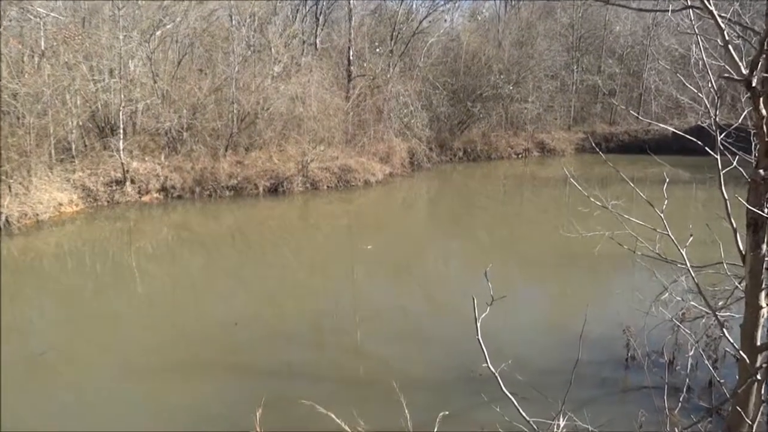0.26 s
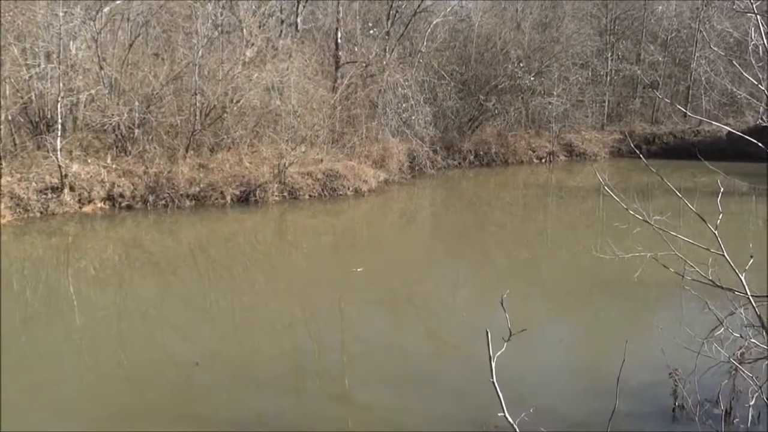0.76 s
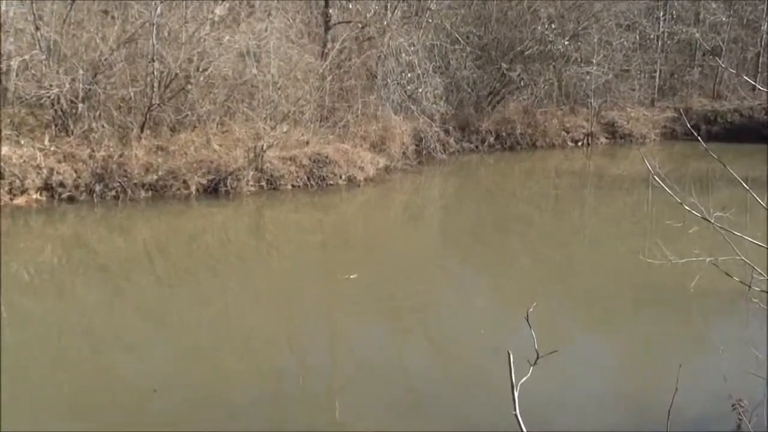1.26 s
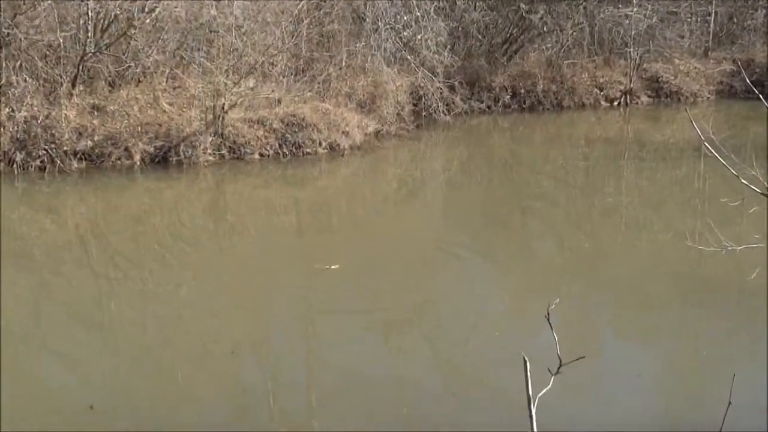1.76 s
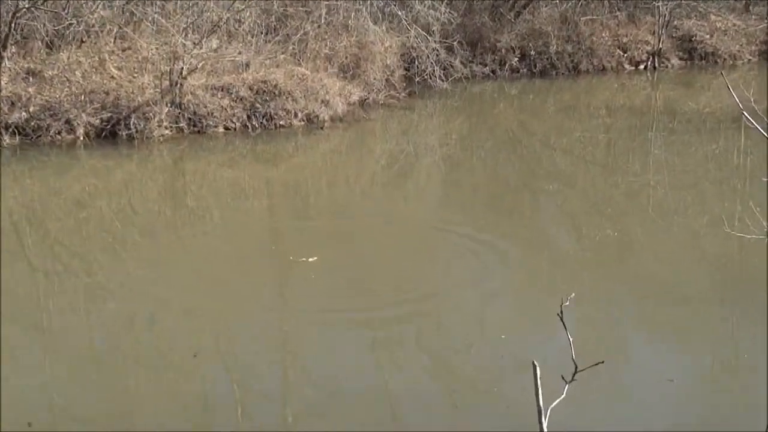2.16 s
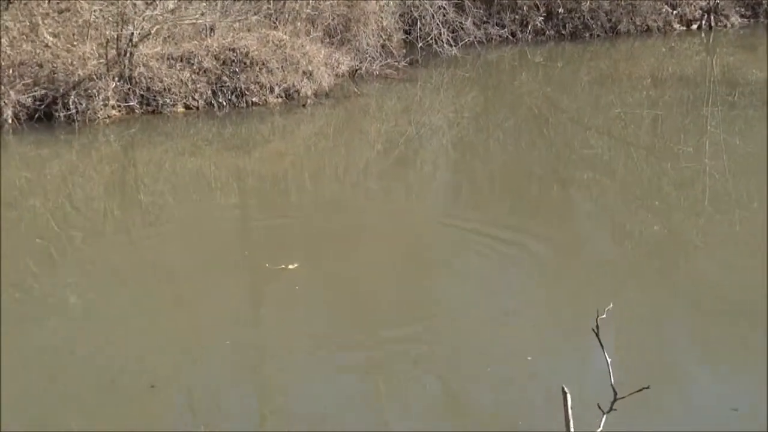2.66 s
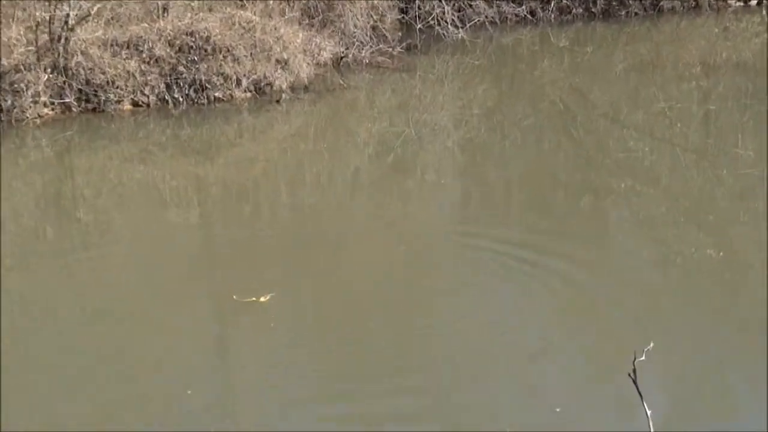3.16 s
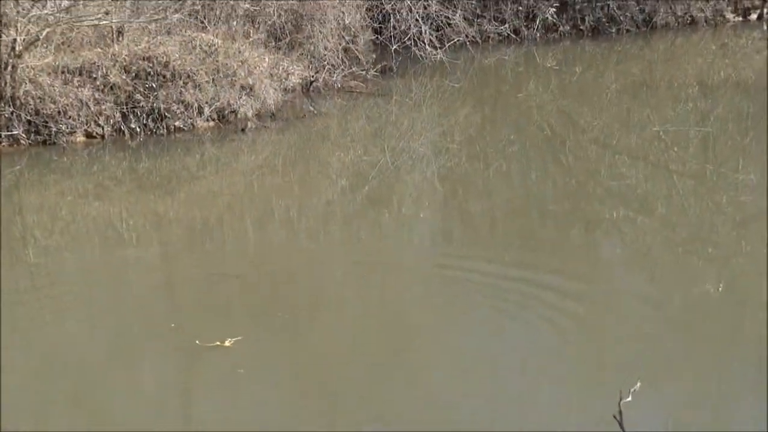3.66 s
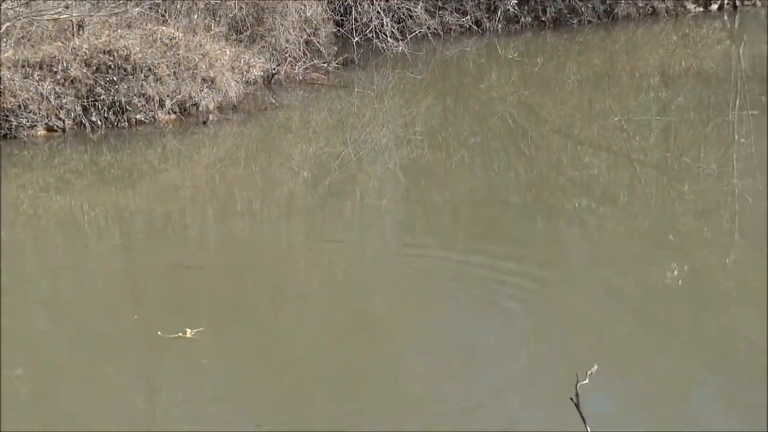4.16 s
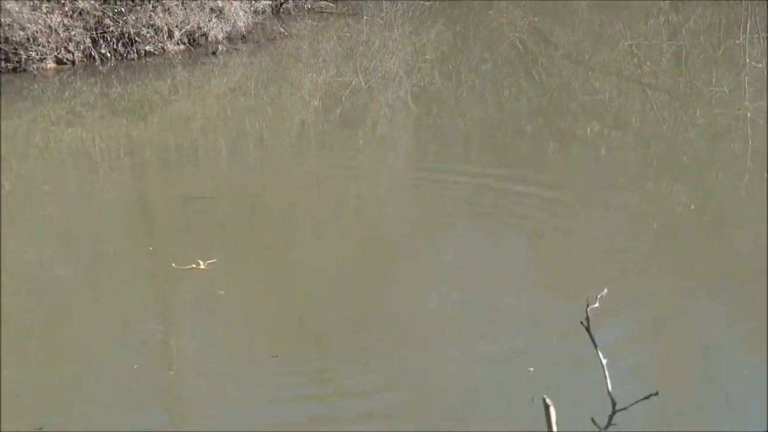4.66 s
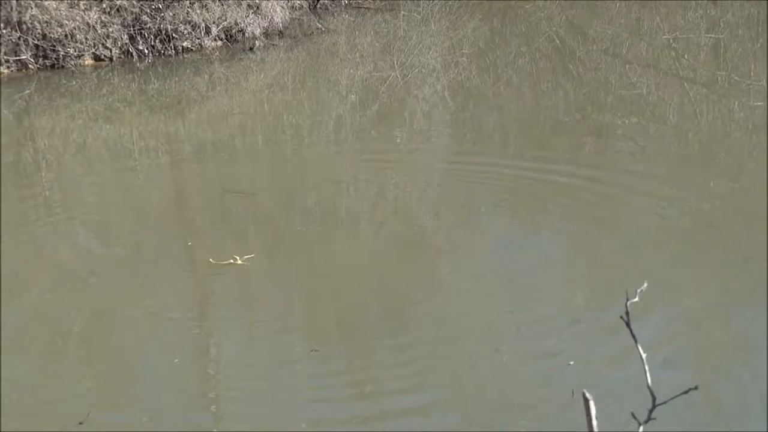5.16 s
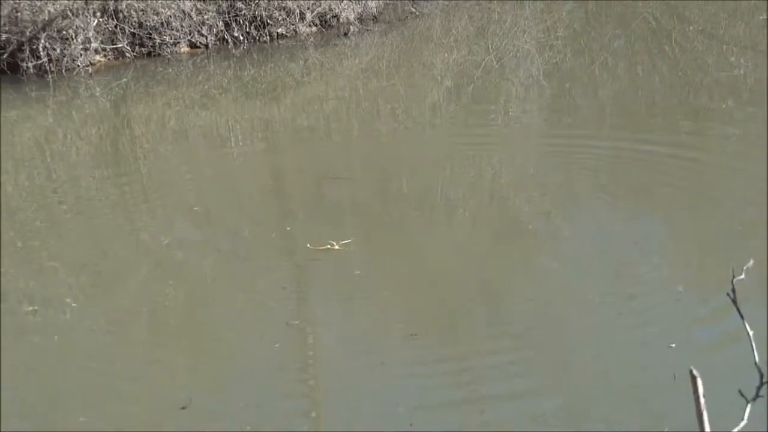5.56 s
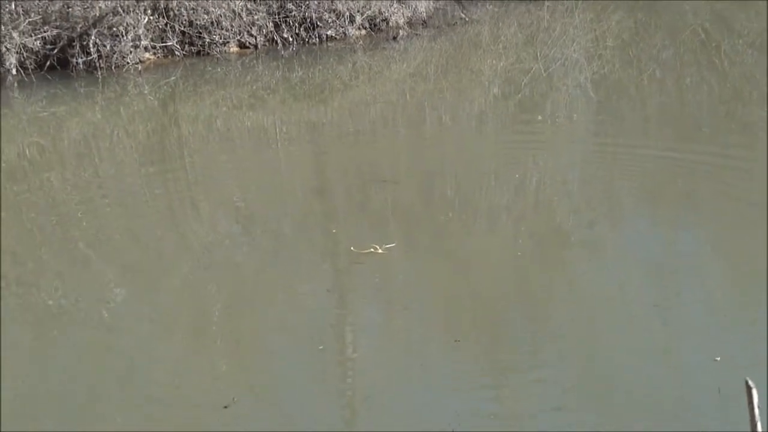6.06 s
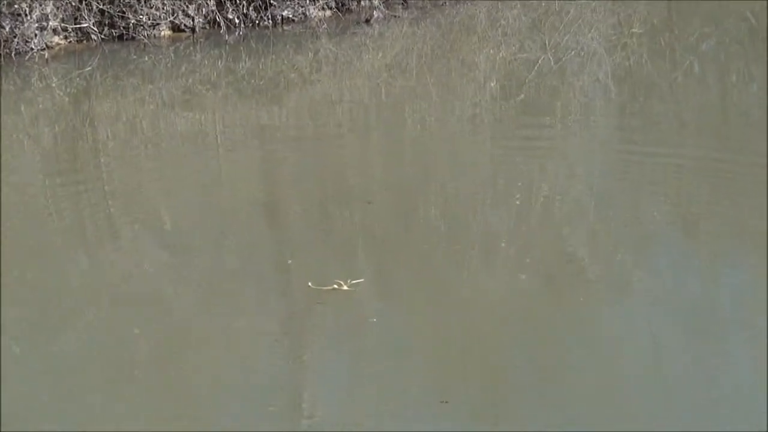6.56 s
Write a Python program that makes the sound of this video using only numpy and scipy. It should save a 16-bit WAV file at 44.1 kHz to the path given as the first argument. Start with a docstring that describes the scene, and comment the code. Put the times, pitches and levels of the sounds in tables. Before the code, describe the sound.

Small frogs are already trilling across a wooded pond, a high chorus of quick pulses that climbs in pitch in overlapping waves, roughly every one to one and a half seconds, with leaders first and others joining. Trees smear the calls into a short echo. Beneath lie soft open air and a faint wavering low hum, stronger from about 4.5 to 6 seconds. A gentle finger rub opens the stretch, and from 0.3 to 3.4 seconds a close zoom motor hisses and ticks thinly. At 3.3 seconds several very sharp plastic clicks snap in quick succession; the chorus drops quieter, then gradually returns. Tiny taps come near 4.0 and 4.6. Around 5.4 to 5.8 there are short rubs and a small click with a low bump. At 6.1 a hard click, scrape and thud land together, and from 6.3 the motor whirrs again under the frogs to the end.

```python
"""From the start, small frogs trill in waves across a wooded pond, leaders first and the rest joining in:
damped pulses quicken and rise in pitch, and tree trunks scatter them. Open air is shaped noise, a far hum
two sines. A hand-held camera adds finger rubs and its zoom motor's ticking hiss, both filtered noise.
After three seconds sharp clicks ring the camera's shell modes, and gain control ducks what follows the
loudest. Later come more rubs, two low nudges of the hand among further clicks, and the zoom again."""
import sys
import numpy as np
from scipy import signal
from scipy.fft import rfft, irfft, next_fast_len
from scipy.io import wavfile
from scipy.ndimage import uniform_filter1d

SR = 44100
rng = np.random.default_rng(int(sys.argv[2]) if len(sys.argv) > 2 else 0)


def to_wav(s):
    """Save 16-bit WAV."""
    ch = np.atleast_2d(s).T  # columns
    pcm = np.round(np.clip(ch, -1, 1) * 32767)  # PCM
    wavfile.write(sys.argv[1], SR, pcm.astype(np.int16))


N = 300321
TIME = np.arange(N) / SR


def gain_of(db):
    """Logarithmic level: 20 dB is a factor of ten in amplitude."""
    return 10 ** (np.asarray(db) / 20)


def evened(x):
    """Normalisation: equal mean power, at an rms of 1."""
    return x / np.sqrt(np.mean(np.abs(x) ** 2) + 1e-20)


def leaned(x, lean_db):
    """Level difference between channels: the left falls and the right rises by lean_db."""
    return gain_of(np.array([[-lean_db], [lean_db]])) * x


def read(points, hz):
    """Interpolation of a spectrum along a log-frequency axis."""
    f, value = np.transpose(points)
    return np.interp(np.log(hz + 1), np.log(f + 1), value)


def add(mix, s, sound):
    """Superposition: mixes a sound in at a time, which may lie before the start."""
    at = round(s * SR)
    sound_length = sound.shape[-1] + min(at, 0)
    part = mix[..., max(at, 0):][..., :sound_length]
    audible = sound[..., max(-at, 0):]
    part += audible[..., :part.shape[-1]]


def coloured(x, spectrum):
    """Linear filtering: weights a signal's spectrum, then scales it to an rms of 1."""
    size = next_fast_len(N)
    weight = gain_of(read(spectrum, np.fft.rfftfreq(size, 1 / SR)))
    return evened(irfft(rfft(x, size) * weight, size)[..., :N])


def drift(knots_per_s):
    """Slow random fluctuation: straight lines between Gaussian knots of unit variance."""
    knots = rng.standard_normal(200)
    return np.interp(TIME * knots_per_s, np.arange(len(knots)), knots)


def noise(spectrum, patchy_db):
    """Partly coherent stereo noise: a shared and an independent part, with drifting spectral patches."""
    # likeness of the two channels: f/Hz, coherence (-1 opposed to 1 alike)
    coherence = [(30, 0.95), (110, 0.94), (220, 0.31), (400, -0.068), (800, -0.31), (1400, -0.21),
                 (2300, 0.35), (4500, 0.51), (8000, 0.89), (15000, 1)]
    frames, hz = N // 512 + 5, np.fft.rfftfreq(2048, 1 / SR)
    a, b, c, d, patches = rng.standard_normal((5, frames, len(hz)))
    patches = uniform_filter1d(patches, size=7, axis=0)  # smooth over time
    patches = evened(uniform_filter1d(patches, size=18, axis=1))  # and over frequency
    same = read(coherence, hz)
    left, independent = a + 1j * b, c + 1j * d
    right = same * left + np.sqrt(1 - same ** 2) * independent
    z = np.array([left, right]) * gain_of(read(spectrum, hz) + patchy_db * patches)
    return evened(signal.istft(z.transpose(0, 2, 1), nperseg=2048, noverlap=1536)[1][:, :N])


def trill(length, first_hz, last_hz, first_rate=14, last_rate=23, ring_s=0.00099,
          jitter_hz=25, uneven_db=2.2, late=1.35):
    """Damped resonance: quickening, rising pulses ring a frog's vocal sac under a swell and fade."""
    # partials of a pulse: multiple of the fundamental, relative level/dB; the second carries the pitch
    partials = [(1, -29), (2, 1), (3, -27)]
    count = int(length * (first_rate + last_rate) / 2 * rng.uniform(.85, 1.15))
    gaps = 1 / np.linspace(first_rate, last_rate, count)  # relative; they are stretched to fill the length
    progress = ((np.cumsum(gaps) - rng.random() * gaps) / gaps.sum())[:, None]
    detune, force, phase = rng.standard_normal((3, 80, 1))[:, :count]
    hz = first_hz + (last_hz - first_hz) * progress + jitter_hz * detune
    # late above 1 puts the swell's peak after the middle, below 1 before it
    swell = np.sqrt(np.sin(np.pi * progress ** late)) * gain_of(uneven_db * force)
    age = np.arange(900) / SR
    # the sac takes a few cycles to build up, which keeps each pulse narrow in pitch
    ring = (age / ring_s) ** 3 * np.exp(-age / ring_s)
    # hz is the second partial, so the fundamental is hz / 2
    tone = sum(gain_of(db) * np.sin(np.pi * k * (hz * age + 2 * phase)) for k, db in partials)
    at = (progress * length * SR).astype(int) + np.arange(len(age))
    return evened(np.bincount(at.ravel(), (swell * ring * tone).ravel()))


def woods(x):
    """Diffuse reverberation: tree trunks scatter calls into a dense tail whose decay depends on frequency."""
    # decay among the trees: f/Hz, t60/s
    decay = [(1500, 0.7), (3000, 0.49), (6000, 0.21)]
    taps = rng.standard_normal(SR // 2)
    hz, t, z = signal.stft(taps, SR, nperseg=256)
    fading = gain_of(-60 * t / read(decay, hz)[:, None])
    tail = signal.istft(z * fading, SR, nperseg=256)[1]
    return signal.oaconvolve(x, tail / np.linalg.norm(tail))[:len(x)]


def chorus(level_db=-4.4, direct_db=-3.6, echo_db=-2.3, side_db=-12, outer_db=-5,
           stagger_s=.045, lean_db=1.28, count=8):
    """Superposed sources: frogs of graded size lead or follow each wave, ahead and slightly to the right."""
    # waves of calling: nominal start t/s, trill length/s, wait until the rest join/s,
    # leaders' first f/Hz, followers' first f/Hz (both for middle size), relative level/dB
    waves = [(-0.73, 1.43, .55, 2620, 2600, -43.7), (0.76, 1.02, .48, 2530, 2795, -46.3),
             (1.96, 1.44, .18, 2680, 2590, -43.2), (3.3, 1.32, .3, 2630, 2545, -42.8),
             (4.7, 1.35, .17, 2745, 2580, -43.6), (5.75, 1.41, .25, 2610, 2660, -46)]
    lead_rise, follow_rise = 440, 410  # Hz per s; every trill climbs steadily in pitch
    lead_spread_hz, follow_spread_hz = 238, 208  # smallest frogs this much higher, largest this much lower
    leaders_db = -1.5  # leaders are weaker
    preroll = 1  # s, room for calls and echoes begun before the start
    sizes = np.linspace(-1, 1, count)
    shares = evened(gain_of(outer_db * sizes ** 2)) / np.sqrt(count)  # middle-sized frogs dominate
    banks = np.zeros((3, N + preroll * SR))  # three stretches of shore, each with its own echo
    for start, length, wait, leaders_hz, followers_hz, db in waves:
        leaders = start, leaders_hz, lead_rise, lead_spread_hz, db + leaders_db
        followers = start + wait, followers_hz, follow_rise, follow_spread_hz, db
        for s, group_hz, rise, spread_hz, group_db in (leaders, followers):
            for frog, (size, share) in enumerate(zip(sizes, shares)):
                hz = group_hz + size * spread_hz
                call = gain_of(group_db) * share * trill(length, hz, hz + rise * length)
                add(banks[frog % len(banks)], preroll + s + rng.uniform(-stagger_s, stagger_s), call)
    direct = gain_of(direct_db) * banks.sum(0)
    ahead = direct + gain_of(echo_db) * sum(woods(bank) for bank in banks)
    side = gain_of(side_db) * woods(banks.sum(0))
    stereo = np.array([ahead + side, ahead - side])[:, preroll * SR:]
    return gain_of(level_db) * leaned(stereo, lean_db)


def near_frogs(echo_db=-2, lean_db=1.0, stagger_s=.02, count=2):
    """Narrow-band resonance: pairs of closer frogs of like size draw a narrow rising line through the chorus."""
    # pairs of closer frogs: nominal start t/s, length/s, first f/Hz, relative level/dB
    pairs = [(-0.75, .91, 2995, -51), (1.2, 1.1, 2635, -52.5), (6.06, .46, 2640, -52)]
    rise = 503  # Hz per s
    calls = np.zeros(N)
    for start, length, hz, db in pairs:
        for frog in range(count):
            call = trill(length, hz, hz + rise * length, first_rate=17, last_rate=26,
                         ring_s=0.0016, jitter_hz=8, late=0.64)
            add(calls, start + rng.uniform(-stagger_s, stagger_s), gain_of(db) * call / np.sqrt(count))
    return leaned(calls + gain_of(echo_db) * woods(calls), lean_db)


def background(air_db=-57.5, hum_hz=97.3, waver_db=2.0, wander_hz=1.63, octave_db=-19):
    """Broadband noise of open air, and a far hum: a wavering tone and its octave by phase accumulation."""
    # open air: f/Hz, relative level/dB per Hz
    air_spectrum = [(20, -7), (45, -3), (80, -0.5), (130, -6.5), (220, -9.5), (450, -11), (800, -13.5),
                    (1400, -15), (2100, -19.5), (4500, -23), (6500, -29), (10000, -33), (16000, -36)]
    # distant hum: t/s, mean level/dB before the waver
    hum_level = [(0, -64.5), (1, -64.5), (2.3, -82), (2.7, -65), (4.5, -58), (6.1, -58), (6.8, -65.5)]
    turns = np.cumsum(hum_hz + wander_hz * drift(9)) / SR
    octave = gain_of(octave_db) * np.sin(2 * np.pi * 2 * turns)
    hum = evened(np.sin(2 * np.pi * turns) + octave)
    air = gain_of(air_db) * noise(air_spectrum, patchy_db=1.5)
    hum_db = np.interp(TIME, *np.transpose(hum_level)) + waver_db * drift(14)
    return air + gain_of(hum_db) * hum


def rubs():
    """Friction noise: short swishes of skin on plastic, each a half-cosine burst of shaped noise."""
    # fingers sliding on the camera: centre t/s, length/s, level/dB at the centre
    slides = [(0.104, 0.79, -60), (5.394, 0.23, -62), (5.765, 0.15, -59.5), (6.15, .6, -62),
              (6.066, 0.054, -45.5), (6.073, 0.011, -47.5)]
    # colour of a rub: f/Hz, relative level/dB per Hz
    skin_spectrum = [(200, 2), (500, 1.5), (1500, 6.5), (2500, 6), (4400, 3), (5800, -1.5), (7500, -3.5),
                     (10000, -3), (13000, -9), (16000, -19)]
    level = np.zeros(N)
    for s, length, db in slides:
        level += gain_of(db) * np.cos(np.pi * np.clip((TIME - s) / length, -.5, .5))
    return level * noise(skin_spectrum, patchy_db=0.5)


def motor_level(level_db=-57.5, waver_db=0.6):
    """Motor load: each run spins up, settles, strains a little more as the lens travels, and coasts down."""
    # runs of the zoom motor: start t/s, stop t/s, run-up/s, starting surge level/dB
    runs = [(.26, 3.43, .14, 0), (6.259, 7, 0.0058, 8)]
    strain, run_down, surge_s = 1.0, 100, .22  # dB per s, dB per s (against the strain), s
    level = np.zeros(N)
    for start, stop, run_up_s, surge_db in runs:
        age, coasting = np.maximum(TIME - start, 0), np.maximum(TIME - stop, 0)
        db = surge_db * np.exp(-age / surge_s) + strain * age - run_down * coasting
        level += np.minimum(age / run_up_s, 1) * gain_of(db)
    return level * gain_of(level_db + waver_db * drift(6))


def zoom(hiss_db=-.5, tick_db=-6, grit_db=-8, tick_s=.0011, uneven_db=2, grit_per_s=550):
    """Periodic and random impacts: the lens drive hisses, its gears crackle, a tooth ticks at every turn."""
    # colour of the motor's hiss: f/Hz, relative level/dB per Hz
    hiss_spectrum = [(150, 6), (350, 9), (800, 6.5), (1400, 3), (2200, 6), (3500, 7), (4400, 9.5),
                     (5800, -5.5), (7000, -2), (9000, -1.5), (10500, 0.5), (13000, -2), (16000, -5.5)]
    # colour of its ticks and crackle: f/Hz, gain/dB
    tick_spectrum = [(1000, -24), (5000, -11), (8000, -3.5), (11000, 2), (13500, 4), (16000, -4.5)]
    ticks_per_s = 28  # mean rate
    turns = np.cumsum(ticks_per_s * (1 + .06 * drift(25))) / SR
    force = gain_of(uneven_db * rng.standard_normal(400))[turns.astype(int)]
    ticks = force * np.exp(-(turns % 1) / ticks_per_s / tick_s) * rng.standard_normal(N)
    impacts = (rng.random(N) < grit_per_s / SR) * rng.exponential(1, N)
    grit_envelope = signal.lfilter([1], [1, -np.exp(-1 / (tick_s * SR))], impacts)
    grit = grit_envelope * rng.standard_normal(N)
    gears = gain_of(tick_db) * coloured(ticks, tick_spectrum)
    gears = gears + gain_of(grit_db) * coloured(grit, tick_spectrum)
    return motor_level() * (gain_of(hiss_db) * noise(hiss_spectrum, patchy_db=1) + gears)


def clicks(rattle_db=-13, rattle_s=0.0031, patch=0.26, lean_db=1.1):
    """Modal excitation: blows ring the shell and rattle, reaching the two microphone ports at unequal times."""
    # blows on the camera's controls: t/s at the right port, peak level/dB before the lean,
    # centre f/Hz of the blow, place from the right port (0) to the left port (1)
    blows = [(3.265, -16.5, 1120, 0.016), (3.3026, -22, 4500, 0.065), (3.3061, -5.5, 3700, 0),
             (3.342, -15.5, 3600, .85), (4.021, -38.5, 1100, 0.98), (4.632, -41, 1100, 0.98),
             (5.553, -33, 780, 0.21), (6.0808, -11.5, 2900, 1)]
    # modes of the camera's shell: f/Hz, relative level/dB, t60/s
    shell_modes = [(570, -16.5, 0.015), (1093, -13.5, 0.015), (1955, -6, 0.0089), (2750, -6.5, 0.012),
                   (3610, -5.5, 0.013), (4230, 0, 0.0046), (5400, 5, 0.0041), (7430, 4, 0.0032),
                   (10100, -5.5, 0.0031), (13600, -6, 0.0012)]
    width_octaves, hardness_law = 1.16, 0.83  # width at 1 kHz; harder blows are wider as well as higher
    port_lag_s = .0001  # travel time between the ports
    out, t, hz = np.zeros((2, N)), np.arange(2048) / SR, np.fft.rfftfreq(2048, 1 / SR)
    modes = np.array([gain_of(db - 60 * t / t60) * np.sin(2 * np.pi * f * t) for f, db, t60 in shell_modes])
    order = np.arange(len(shell_modes)) + 1
    lead = .002  # s, room for the filter's onset
    for s, db, centre_hz, place in blows:
        octaves = width_octaves * (centre_hz / 1000) ** hardness_law
        left_lag = port_lag_s * (1 - 2 * place)
        delays = lead + np.array([[left_lag], [0]])
        mode_shape = abs(np.cos(np.pi * order * place / 2))  # a mode struck at its node is weak
        drive = (-1) ** order * (patch + (1 - patch) * mode_shape)
        rattle = gain_of(rattle_db) * np.exp(-t / rattle_s) * rng.standard_normal((2, len(t)))
        blow = drive @ modes + rattle
        colour = 1 / (1 + (np.log2((hz + 1) / centre_hz) / octaves) ** 2) ** 1.48
        click = irfft(rfft(blow) * colour * np.exp(-2j * np.pi * hz * delays))
        add(out, s - lead, gain_of(db) * click / abs(click).max())
    return leaned(out, lean_db)


def thuds(rise_s=.009):
    """Damped oscillation: the hand nudges the whole camera, a low push that soon dies away."""
    # nudges of the hand: t/s, envelope's peak level/dB, f/Hz
    nudges = [(5.548, -46, 50), (6.077, -42.5, 89.6)]
    out, t = np.zeros(N), np.arange(SR // 8) / SR
    for s, db, hz in nudges:
        envelope = t / rise_s * np.exp(1 - t / rise_s)
        add(out, s, gain_of(db) * envelope * np.sin(2 * np.pi * hz * t))
    return out


def scene():
    """Superposition of the pond and the camera's own noises."""
    return chorus() + near_frogs() + background() + zoom() + rubs() + clicks() + thuds()


def record(dry, threshold_db=-26.5, share=.66, recovery_db=4, edge_hz=15950):
    """Peak-hold compression: gain drops within milliseconds, recovers over seconds; then a low-pass filter."""
    smooth = np.exp(-1 / (0.0032 * SR))
    power = signal.lfilter([1 - smooth], [1, -smooth], (dry ** 2).mean(0))
    power_db = 10 * np.log10(power + 1e-12)
    fall = recovery_db * TIME  # the held peak falls by recovery_db each second
    held_db = np.maximum.accumulate(power_db + fall) - fall
    over_db = np.maximum(held_db - threshold_db, 0)
    # share is the part of the excess that is taken away
    ducked = dry / gain_of(share * signal.lfilter([1 - smooth], [1, -smooth], over_db))
    low_pass = signal.firwin(511, edge_hz, window=("kaiser", 9), fs=SR)
    return signal.oaconvolve(ducked, low_pass[None], "same")


dry = scene()
out = record(dry)
to_wav(out)
```